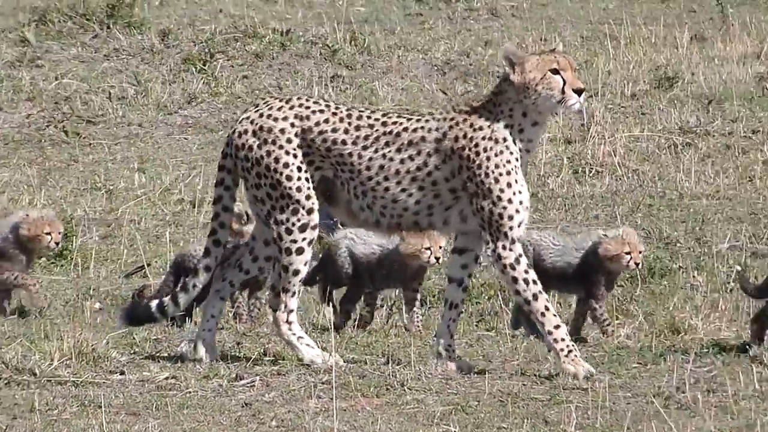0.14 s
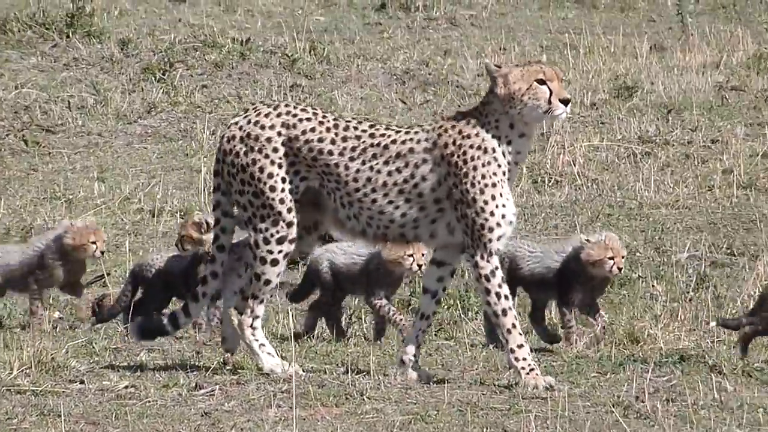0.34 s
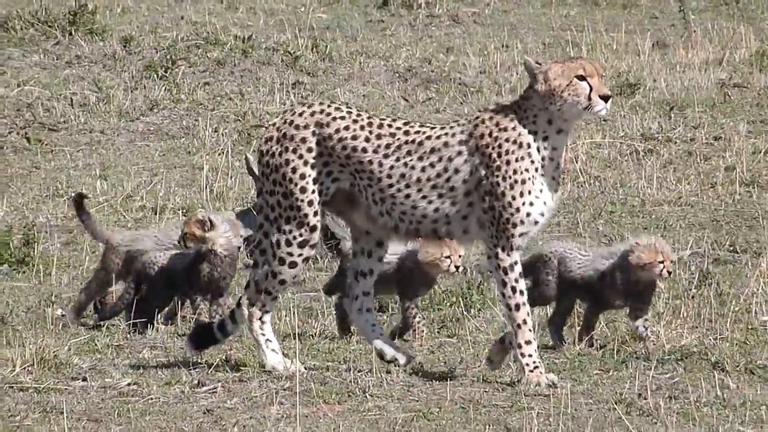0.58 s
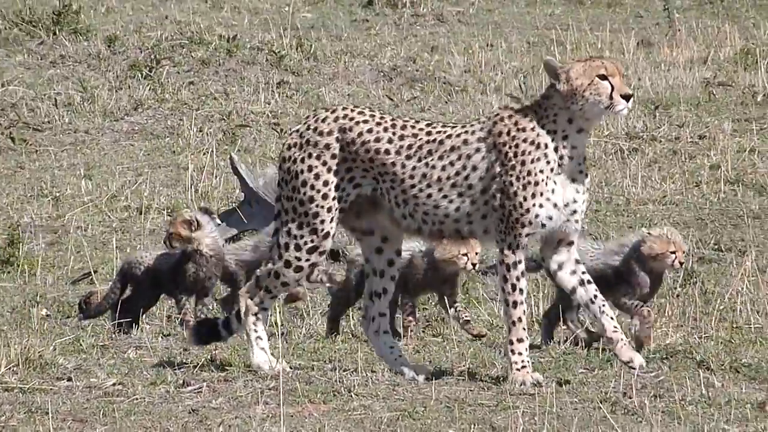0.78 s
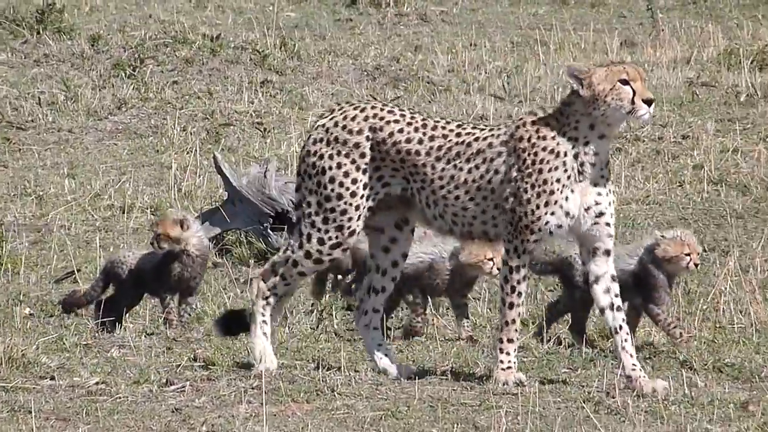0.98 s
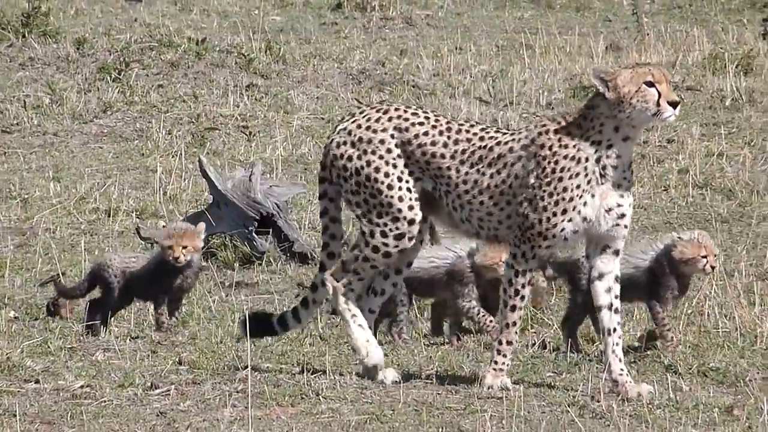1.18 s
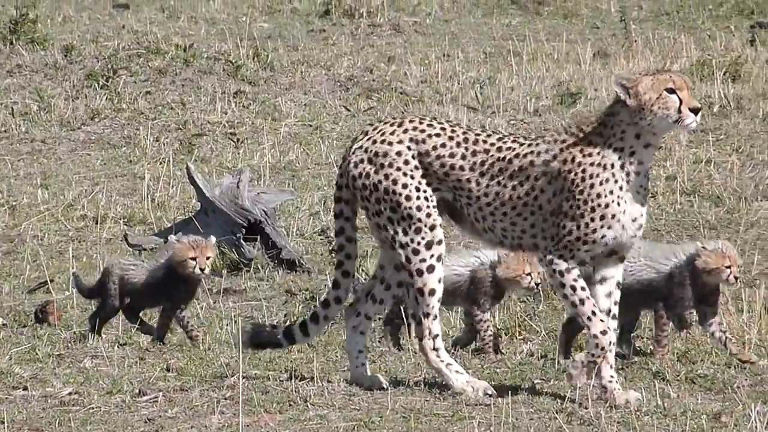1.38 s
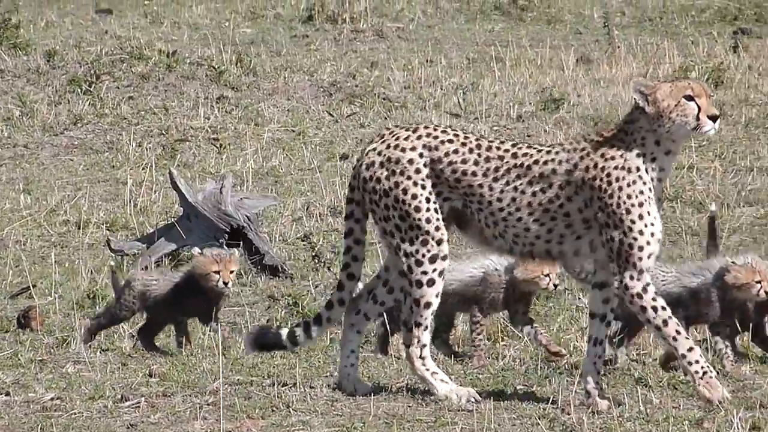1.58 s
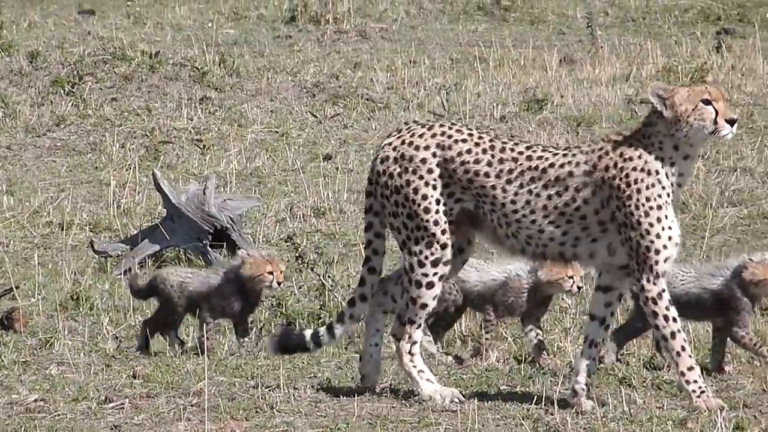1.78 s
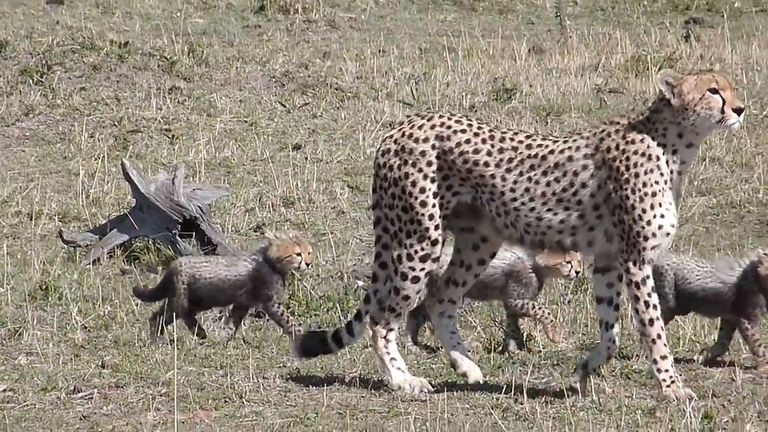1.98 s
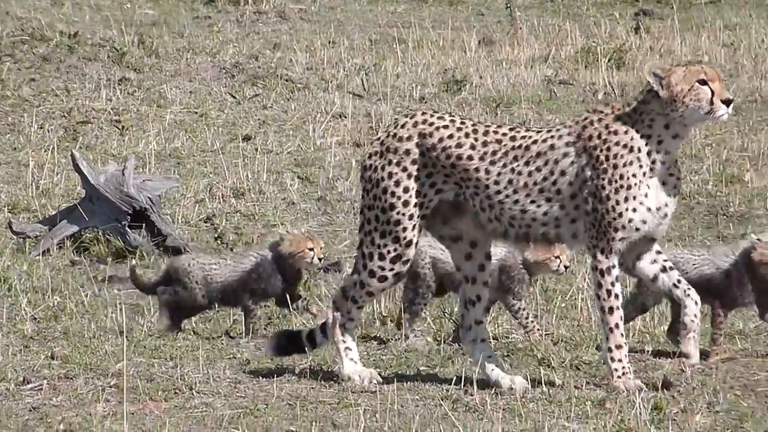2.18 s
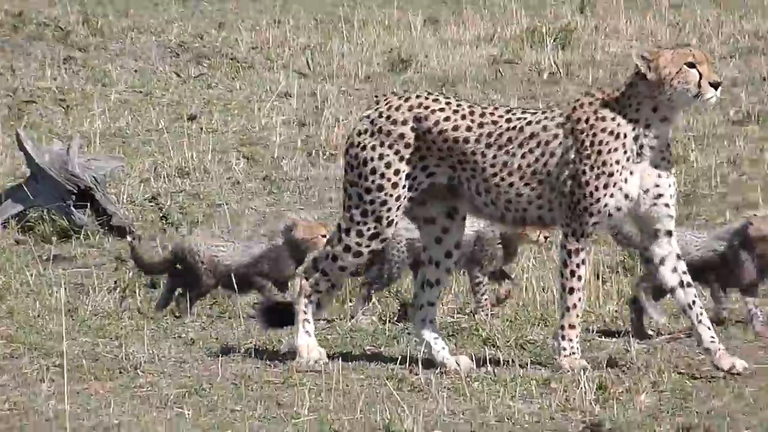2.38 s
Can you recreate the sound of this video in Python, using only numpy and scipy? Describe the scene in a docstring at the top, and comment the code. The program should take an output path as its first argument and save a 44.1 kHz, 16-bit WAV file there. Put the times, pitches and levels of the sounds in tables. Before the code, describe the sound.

Two cameras take three single shots outdoors, each a quick mechanical clack and tiny whirr. The first and last are sharp, near the microphone on the right; the middle one is softer, to the left. A low rumble slowly grows behind.

```python
"""Open grassland, where two reflex cameras fire: a close one on the right twice, a farther one on the
left once. Each exposure is a quick run of latch, mirror and curtain blows, then the whirr of the motor
that recocks the shutter. Handled gear ticks faintly. Behind the cameras a low rumble slowly grows,
a small bird chirps far off and a soft hiss swells at the end."""
import sys
import numpy as np
from scipy import signal
from scipy.fft import rfft, irfft, next_fast_len
from scipy.io import wavfile

SR = 44100
rng = np.random.default_rng(int(sys.argv[2]) if len(sys.argv) > 2 else 0)


def master_out(mix):
    """Clip the mix to full scale and print it as 16-bit PCM to the path in sys.argv[1]."""
    frames = np.transpose(np.atleast_2d(mix))
    ceiling = np.clip(frames, -1, 1)
    pcm = np.round(ceiling * 32767).astype(np.int16)
    wavfile.write(sys.argv[1], SR, pcm)


N = 108045

# exposures of the close camera (time [s], level [dB])
NEAR_SHOTS = [(.2243, .3), (1.5997, .6)]
# its recocking motor (start after release [s], length [s], spin-down t60 [s], fade [dB/s],
# case [dB], lever [dB], blade [dB])
NEAR_MOTOR = (.108, .083, .065, 40, -40.5, -34.8, -31.6)


def near_camera():
    """Two crisp exposures close on the right: blows, gear whirr, motor whine and ringing parts."""
    # a faint lead-in swelling into the latch click, then mirror up, two curtains,
    # mirror down and bounce, cocking catch, cam
    # (time after release [s], rise [s], t60 [s], case [dB], lever [dB], blade [dB])
    blows = [ (-.002, .004, .010, -50, -41, -42), (.0008, .0006, .014, -25.5, -15.5, -9.6),
             (.0135, .004, .030, -35, -31, -29.5), (.0192, .0018, .029, -22, -19.3, -19),
             (.0585, .002, .050, -44, -33, -26), (.0645, .003, .052, -29.5, -26, -22.5),
             (.0840, .004, .030, -45, -33, -27.5), (.0882, .0005, .012, -38, -21, -10),
             (.0995, .001, .020, -35, -27, -19.5), (.1040, .0008, .018, -19, -16.7, -9.3),
             (.1238, .0018, .038, -30, -28, -20.5), (.1812, .001, .018, -37, -36, -27),
             (.1905, .002, .016, -50, -44, -32), ]
    # the mirror's edge as it drops (time after release [s], centre [Hz], width [oct], t60 [s], level [dB])
    crack = (.1035, 12000, .15, .014, -16)
    # struck parts (time after release [s], pitch [Hz], t60 [s], level [dB])
    parts = [(0, 3480, .03, -22.5), (.02, 730, .12, -41), (.058, 4850, .08, -36),
             (.0882, 10450, .011, -8.5), (.0882, 9500, .009, -15), (.102, 715, .06, -27),
             (.103, 1475, .04, -24), (.19, 4850, .06, -42)]
    colour = [(330, -14), (540, -8), (700, -1.5), (950, -3), (1500, .5), (2500, -1.5), (3400, -2),
              (4000, -3.5), (4800, -.5), (6500, -1.5), (8200, 2.4), (10200, 3.5), (12000, -.3), (13500, -5),
              (15700, -14)]  # tone of the body (frequency [Hz], level [dB])
    # resonances of the body and of the gear train (frequency [Hz], width [Hz], level [dB])
    body_modes = [(725, 45, 10), (1140, 35, 6), (1475, 55, 12), (2020, 60, 2), (2490, 110, 4),
                  (3450, 120, 0), (4780, 170, 4), (8330, 130, 4), (9340, 100, 3), (9640, 80, 4),
                  (10480, 110, 4)]
    gear_modes = [(4080, 70, 3), (4580, 60, 4), (5560, 80, 4), (7130, 55, 4), (9810, 150, 3)]
    pan = [(650, -.5), (1500, -5), (4800, -7.3), (9500, -2.5), (14000, -4)]  # balance (frequency [Hz], left minus right [dB])
    lead = [(500, -.05), (1300, -.05), (2300, .45), (4500, -.2), (7000, -1.3), (10500, -2.2), (13000, -2.8)]  # phase between the sides (frequency [Hz], left lead [rad])
    alike = [(600, .98), (2000, .8), (5000, .5), (10000, .78), (15000, .7)]  # stereo focus (frequency [Hz], left-right likeness [-1..1])
    body = housing(colour, body_modes)
    gears = body * ringing(gear_modes) * np.sqrt(below(hz=13800))  # the whirr is duller than the blows
    action = shutter(NEAR_SHOTS, blows, body, grit_db=1.2)
    action += recocking(NEAR_SHOTS, NEAR_MOTOR, gears, grit_db=3)
    action += sum(amp(db) * click(start + crack[0], *crack[1:]) for start, db in NEAR_SHOTS)
    camera = spread(action, alike) + whine() + pings(NEAR_SHOTS, parts)
    return amp(-1.2) * placed(camera, pan, lead, walls_db=-12)


def far_camera():
    """One softer, slower exposure on the left: blows, whirr and ringing parts."""
    shots = [(1.1775, 0)]  # exposure (time [s], level [dB])
    # shutter blows (time after release [s], rise [s], t60 [s], case [dB], lever [dB], blade [dB])
    blows = [ (.0018, .0015, .032, -32.5, -35, -32), (.0245, .008, .070, -41, -37, -38),
             (.0500, .002, .030, -37, -33, -31.5), (.0610, .003, .040, -35, -37, -35),
             (.0910, .0022, .028, -28, -24.7, -24.3), (.1520, .003, .035, -47, -42.5, -34),
             (.1715, .001, .015, -47, -40, -42), (.1858, .002, .042, -33.5, -34.5, -39.5),
             (.2090, .007, .110, -39, -40, -50), ]
    motor = (.1, .13, .1, 55, -47, -51.5, -51)  # recocking motor, columns as in NEAR_MOTOR
    parts = [(.05, 745, .35, -46), (.171, 2950, .06, -39), (.184, 570, .08, -33.5), (.185, 1185, .05, -38)]  # struck parts (time after release [s], pitch [Hz], t60 [s], level [dB])
    colour = [(300, -10), (560, 2), (900, -2), (1400, 0), (2400, -3), (3100, 1), (4200, -4), (6100, 0),
              (7800, -4), (9700, 2), (11000, -5), (15500, -16)]  # tone of the body (frequency [Hz], level [dB])
    modes = [(545, 70, 7), (745, 45, 7), (1185, 60, 4), (3100, 200, 1), (3750, 100, 3), (9700, 200, 2)]  # body resonances (frequency [Hz], width [Hz], level [dB])
    pan = [(550, 0), (1400, 4.5), (5500, 6.5), (9500, 1.5), (14000, 4.5)]  # balance (frequency [Hz], left minus right [dB])
    lead = [(500, 0), (4000, -.1), (6500, .8), (9500, 2.3), (15000, 2.5)]  # phase between the sides (frequency [Hz], left lead [rad])
    alike = [(600, .95), (5000, .7), (12000, .6)]  # stereo focus (frequency [Hz], left-right likeness [-1..1])
    body = housing(colour, modes)
    action = shutter(shots, blows, body, grit_db=2.5) + recocking(shots, motor, body, grit_db=2.5)
    camera = spread(action, alike) + pings(shots, parts)
    return amp(-1.5) * placed(camera, pan, lead, walls_db=-9)


def shutter(shots, blows, body, grit_db):
    """Latch, mirror and curtain blows add up in power and rattle the camera at each exposure."""
    t = np.arange(-SR // 10, SR // 2) / SR
    powers = sum((amp(levels)[:, None] * blow(t - after, rise, t60)) ** 2
                 for after, rise, t60, *levels in blows)
    forces = [sum(amp(db) * np.interp(clock() - start, t, np.sqrt(power)) for start, db in shots)
              for power in powers]
    return rattle(forces, body, grit_db)


def recocking(shots, motor, body, grit_db):
    """The gear train whirrs, pulsing once a turn, with every tooth catching differently."""
    turn_hz, pulse_depth = 185, .36
    tooth_hz, tooth_scatter_db = 600, 2.2
    t = clock()
    tooth_times = np.arange(N) / tooth_hz
    teeth = unit(amp(tooth_scatter_db * np.interp(t, tooth_times, rng.standard_normal(N))))
    drive = np.zeros(N)
    for start, db in shots:
        pulse = 1 + pulse_depth * np.cos(2 * np.pi * turn_hz * (t - start))
        drive += amp(db) * winding(t - start, motor) * pulse
    return rattle([amp(db) * drive * teeth for db in motor[4:]], body, grit_db)


def whine():
    """The close camera's motor tone sags as the spring loads it."""
    start_hz, sag_hz_per_s = 1495, 800
    level_db, fade_db_per_s = -34, 110
    out = np.zeros(N)
    for start, db in NEAR_SHOTS:
        t = clock() - start
        running = np.clip(t - NEAR_MOTOR[0], 0, NEAR_MOTOR[1])
        envelope = amp(level_db + db - fade_db_per_s * running) * winding(t, NEAR_MOTOR)
        out += envelope * glide(start_hz - sag_hz_per_s * running)
    return out


def winding(t, motor, rise=.003):
    """Envelope of the motor: it starts, eases as it runs and spins down."""
    start, length, t60, fade = motor[:4]
    age = t - start
    spin_up = blow(np.minimum(age, 0), rise, t60)
    spin_down = blow(np.maximum(age - length, 0), rise, t60)
    return spin_up * amp(-fade * np.clip(age, 0, length)) * spin_down


def pings(shots, parts):
    """Single parts of a camera ring on after they are struck."""
    out = np.zeros(N)
    for start, shot_db in shots:
        for after, hz, t60, db in parts:
            t = clock() - start - after
            out += amp(shot_db + db) * blow(t, .0005, t60) * np.sin(2 * np.pi * (hz * t + rng.random()))
    return out


def rattle(forces, body, grit_db):
    """Gritty contacts shake the body: the case thuds low, levers clack in the mids, blades snap on top."""
    low, low_and_mid = below(hz=2500), below(hz=7000)
    out = np.zeros((2, N))
    for force, share in zip(forces, [low, low_and_mid - low, 1 - low_and_mid]):
        contacts = unit(rng.standard_normal((2, N)) * amp(grit_db * rng.standard_normal(N)))
        out += filtered(contacts * force, causal(body * np.sqrt(np.abs(share))))
    return out


def housing(colour, modes):
    """Gain of a camera body: its colour and its resonances, without bass."""
    low_cut = np.sqrt(1 - below(colour[0][0]))
    return amp(curve(colour)) * ringing(modes) * low_cut


def ringing(modes):
    """Gain of a set of resonances standing over a flat base."""
    peaks = sum(amp(2 * db) / (1 + ((grid() - hz) * 2 / width) ** 2) for hz, width, db in modes)
    return np.sqrt(1 + peaks)


def placed(source, pan, lead, walls_db):
    """A source off to one side, with the short answer of nearby surfaces."""
    t60_s, delay_s = .06, .002
    t = np.arange(SR // 4) / SR
    sides = np.array([[.5], [-.5]])
    direct = filtered(source, amp(sides * curve(pan)) * np.exp(1j * sides * curve(lead)))
    tail = rng.standard_normal((2, len(t))) * amp(-60 * t / t60_s) * (t > delay_s)
    tail /= np.linalg.norm(tail, axis=1, keepdims=True)
    return direct + amp(walls_db) * signal.fftconvolve(direct, tail, axes=1)[:, :N]


def handling():
    """Faint ticks and soft bumps of gear being handled."""
    ticks = [(.122, 7000, 1, .015, -51), (.570, 7500, 1, .011, -48.5), (.815, 9000, .6, .035, -51),
             (1.49, 4400, .42, .024, -46.5), (1.845, 700, .45, .04, -42.5), (1.897, 6000, 1, .022, -44.5)]  # contacts (time [s], centre [Hz], width [oct], t60 [s], level [dB])
    alike = [(600, .9), (5000, .4), (12000, .1)]  # stereo focus (frequency [Hz], left-right likeness [-1..1])
    return spread(sum(click(*tick) for tick in ticks), alike)


def click(time, hz, octaves, t60, db):
    """One short contact in its own band, as two unrelated noise bursts."""
    band = np.exp(-.5 * (np.log2((grid() + 1) / hz) / octaves) ** 2)
    noise = unit(filtered(rng.standard_normal((2, N)), band))
    return amp(db) * blow(clock() - time, .05 * t60, t60) * noise


def bird():
    """Thin, mostly falling chirps from far away."""
    chirps = [(.738, .042, 3800, 2950, -66.5), (.779, .018, 4850, 4450, -66.5),
              (.836, .016, 4500, 4600, -65.5), (.864, .032, 3300, 2700, -63.5)]  # calls (time [s], length [s], start [Hz], end [Hz], level [dB])
    out = np.zeros(N)
    for start, length, start_hz, end_hz, db in chirps:
        progress = np.clip((clock() - start) / length, 0, 1)
        arch = np.sqrt(np.abs(np.sin(np.pi * progress)))
        out += amp(db) * arch * glide(start_hz + (end_hz - start_hz) * progress)
    return out


def open_air():
    """The growing low rumble and the thin hiss of the open air."""
    # swell of each bed (time [s], level [dB])
    rumble_swell = [(0, -47.5), (.4, -49), (1.1, -47), (1.6, -45.5), (2, -44), (2.45, -44)]
    hiss_swell = [(0, -58), (.6, -60), (1.1, -60), (1.95, -58), (2.25, -58), (2.36, -52), (2.45, -50)]
    # their tone (frequency [Hz], level [dB])
    rumble_colour = [(20, -9.5), (50, -5.5), (95, -2), (155, .5), (210, -3), (260, -2.5), (330, -6),
                     (480, -9.5), (700, -9), (1050, -15), (1700, -24), (3000, -42), (6000, -80)]
    hiss_colour = [(600, -12), (2000, -1), (4000, -1), (7000, -3), (9500, -.5), (12500, -6), (15500, -10)]
    # their stereo focus (frequency [Hz], left-right likeness [-1..1])
    rumble_alike = [(30, .88), (70, .9), (160, .995), (300, .96), (550, .9), (1600, .6)]
    hiss_alike = [(1600, .45), (5000, -.1), (15000, -.2)]
    return bed(rumble_swell, rumble_colour, rumble_alike) + bed(hiss_swell, hiss_colour, hiss_alike)


def bed(swell, colour, alike):
    """Coloured stereo noise riding a level curve."""
    noise = filtered(rng.standard_normal((2, N)), amp(curve(colour)))
    return amp(np.interp(clock(), *np.transpose(swell))) * unit(spread(noise, alike))


def blow(t, rise, t60):
    """Envelope of a contact that peaks at t = 0."""
    return np.exp(np.maximum(np.minimum(t / rise, -np.log(1000) * t / t60), -20))


def glide(hz):
    """A sine that follows a pitch curve."""
    return np.sin(2 * np.pi * np.cumsum(hz) / SR)


def spread(pair, alike):
    """Mixes two unrelated signals into left and right of a given likeness."""
    angle = np.arccos(np.clip(curve(alike), -1, 1)) / 2
    mid, side = filtered(pair, np.array([np.cos(angle), np.sin(angle)]))
    return np.array([mid + side, mid - side])


def causal(gain):
    """Minimum-phase response of this shape, at energy 1: it rings only after a blow."""
    cepstrum = irfft(np.log(np.maximum(unit(gain), 1e-5)))
    half = len(cepstrum) // 2
    cepstrum[1:half] *= 2
    cepstrum[half + 1:] = 0
    return np.exp(rfft(cepstrum))


def filtered(x, response):
    """x through a response on the frequency grid."""
    size = 2 * (len(grid()) - 1)
    return irfft(rfft(x, size) * response, size)[..., :N]


def below(hz):
    """Share of the power that passes under a soft band edge."""
    return 1 / (1 + (grid() / hz) ** 8)


def curve(points):
    """Joins (frequency [Hz], value) points across the grid on a log axis."""
    hz, values = np.transpose(points)
    return np.interp(np.log(grid() + 1), np.log(hz + 1), values)


def grid():
    """Frequencies of the padded spectrum [Hz]."""
    return np.fft.rfftfreq(2 * next_fast_len(N // 2 + 4096, real=True), 1 / SR)


def clock():
    """Time of every sample [s]."""
    return np.arange(N) / SR


def amp(db):
    """Decibels to gain."""
    return 10 ** (np.asarray(db) / 20)


def unit(x):
    """x at rms 1."""
    return x / np.sqrt(np.mean(x ** 2) + 1e-20)


def scene():
    """Both cameras over the quiet grassland."""
    return near_camera() + far_camera() + handling() + bird() + open_air()


def record(dry):
    """Soft clipping rounds the highest peaks, and a steep low-pass trims the very top."""
    ceiling, knee, top_hz = .7, 4, 15750
    rounded = dry / (1 + np.abs(dry / ceiling) ** knee) ** (1 / knee)
    return filtered(rounded, 1 / (1 + (grid() / top_hz) ** 120))


dry = scene()
out = record(dry)
master_out(out)
```